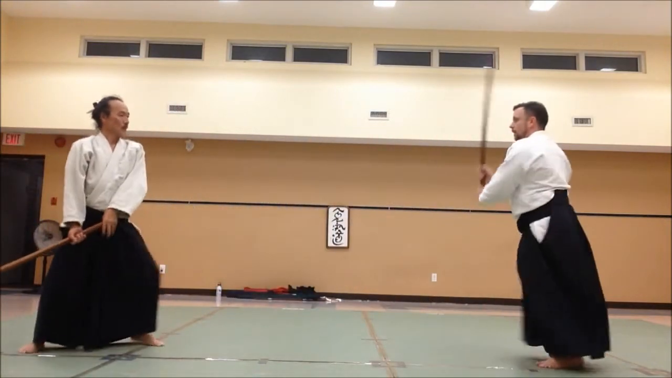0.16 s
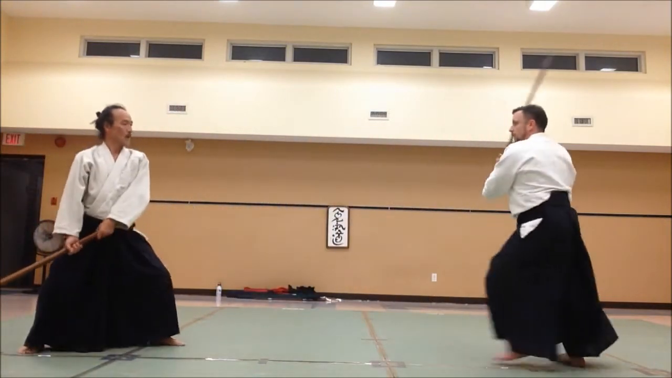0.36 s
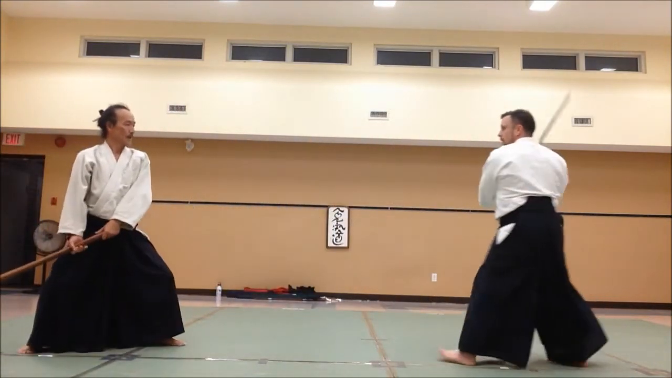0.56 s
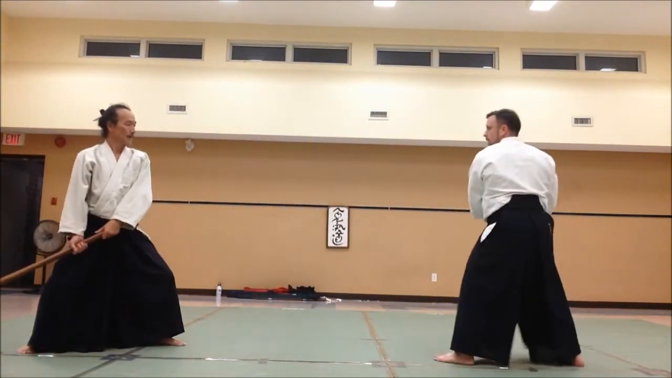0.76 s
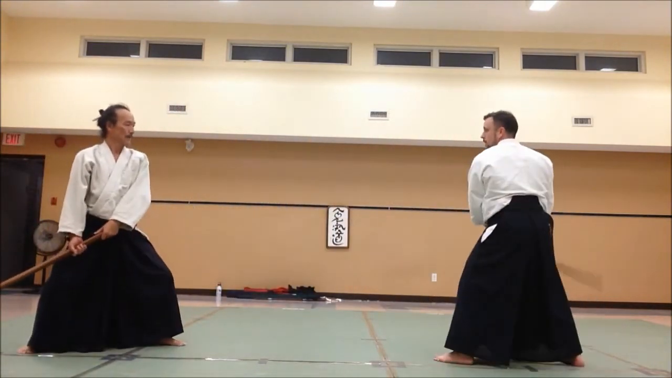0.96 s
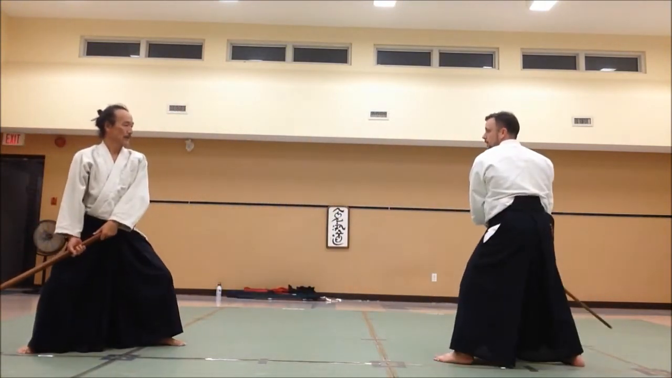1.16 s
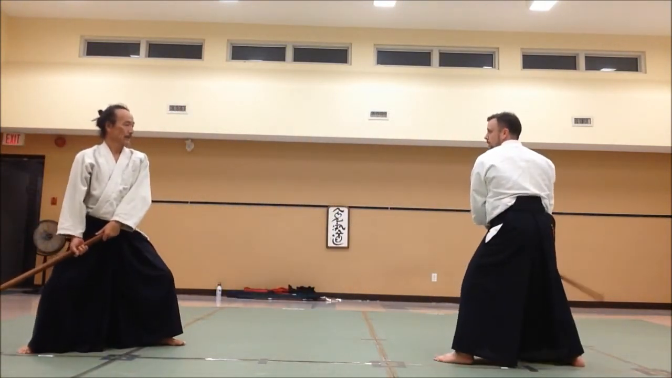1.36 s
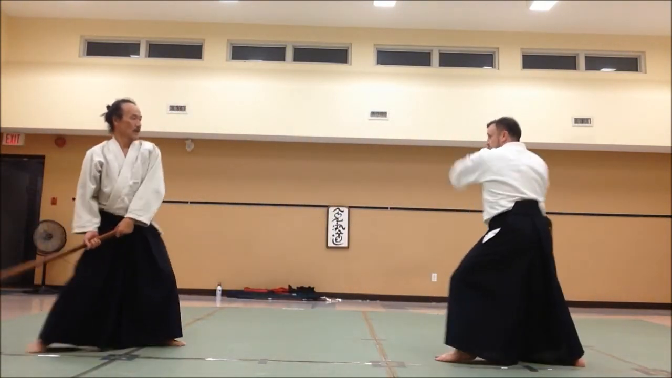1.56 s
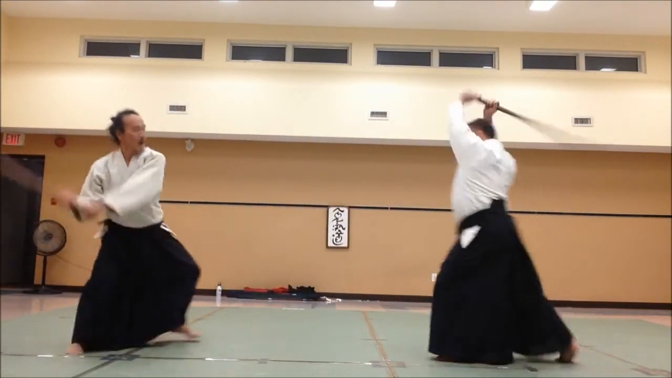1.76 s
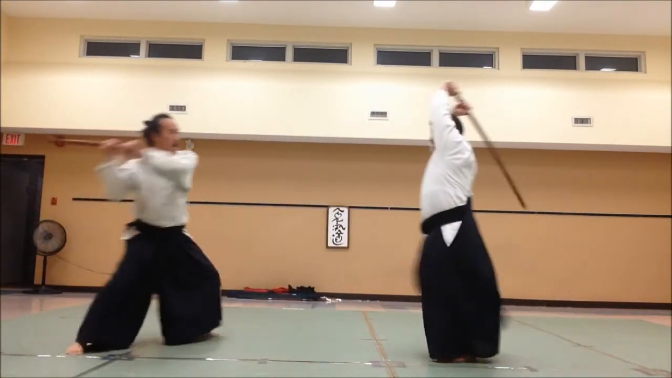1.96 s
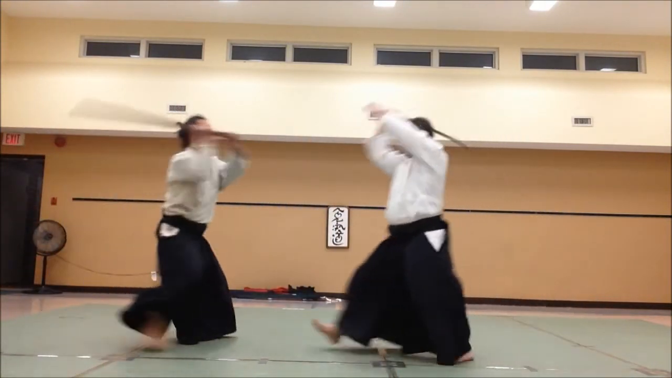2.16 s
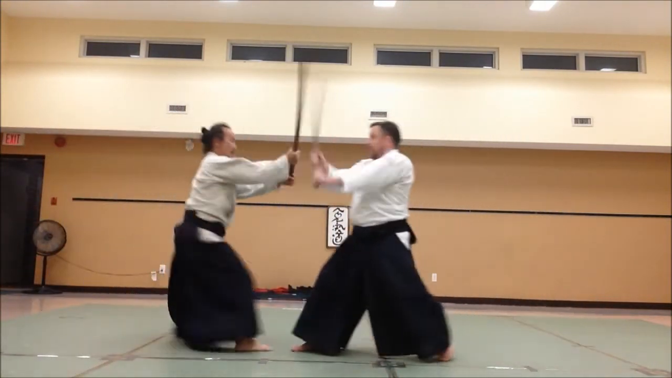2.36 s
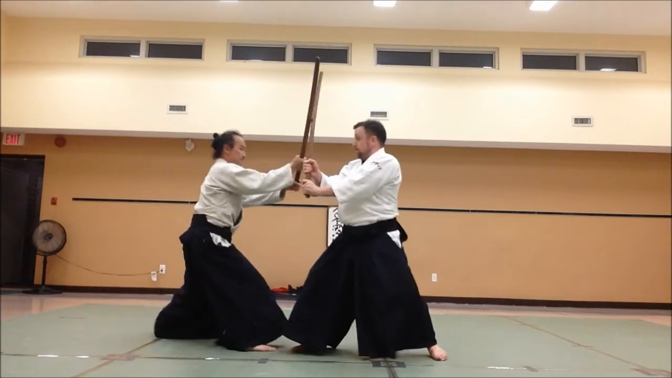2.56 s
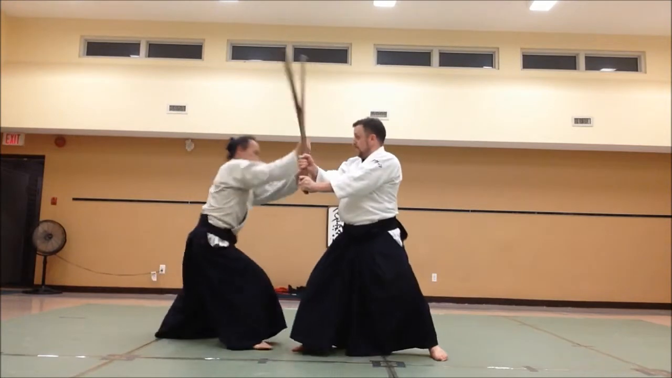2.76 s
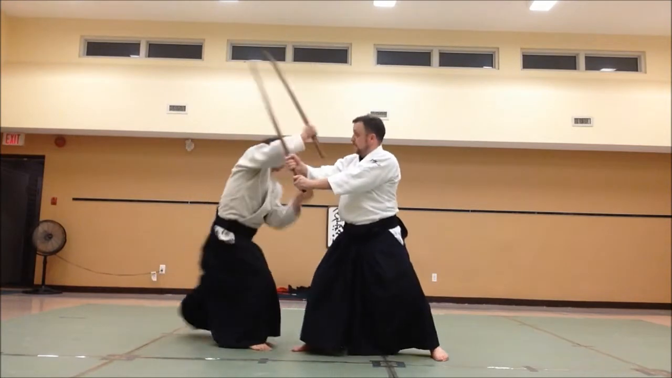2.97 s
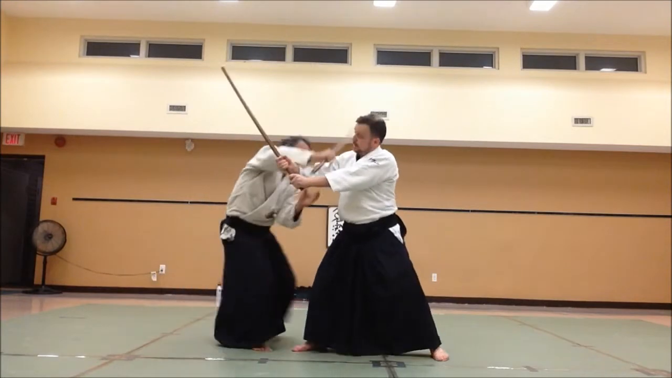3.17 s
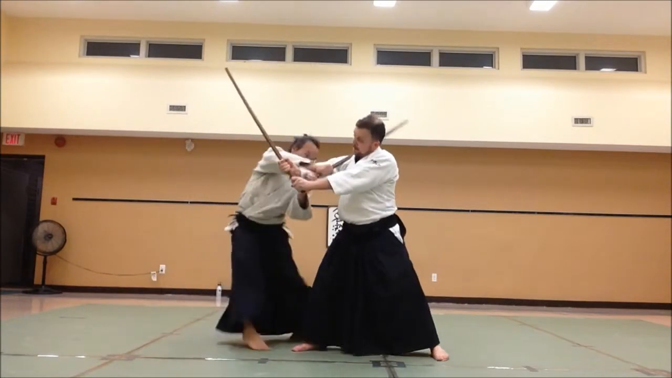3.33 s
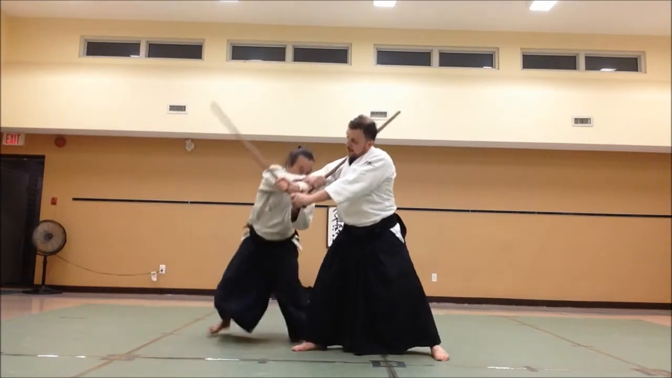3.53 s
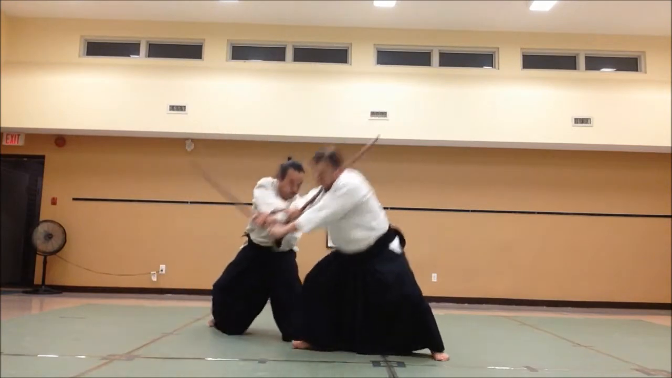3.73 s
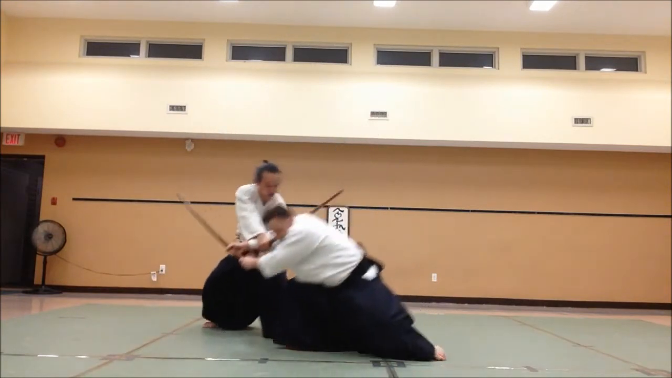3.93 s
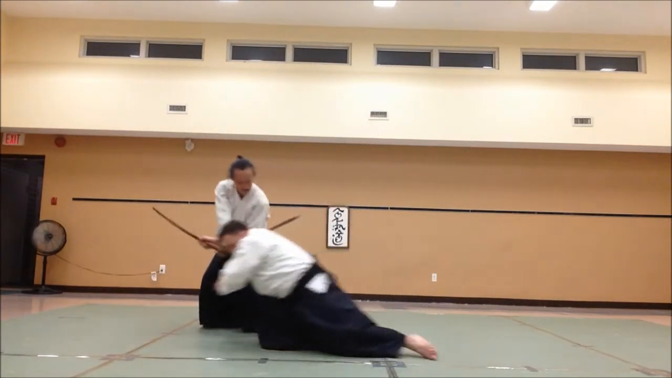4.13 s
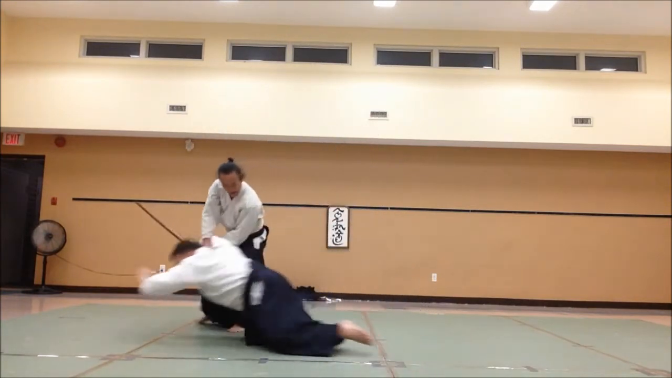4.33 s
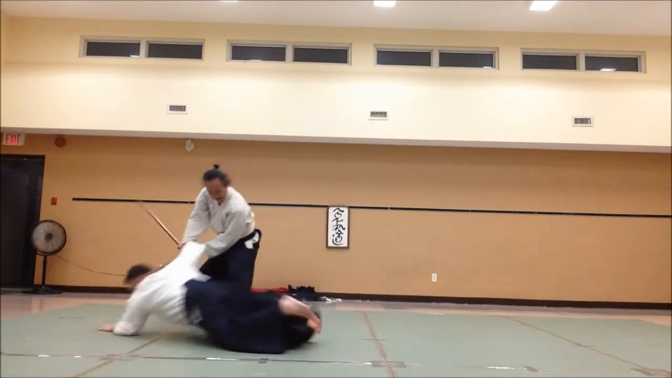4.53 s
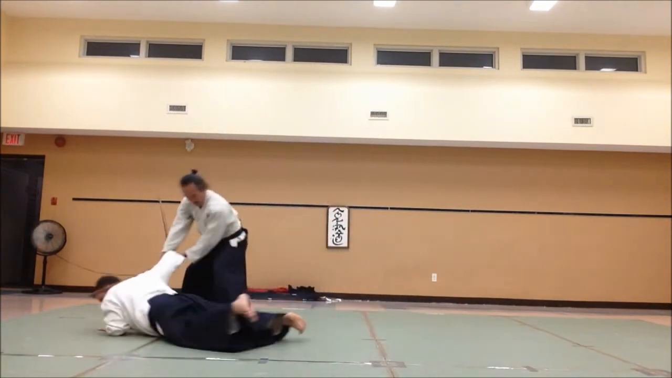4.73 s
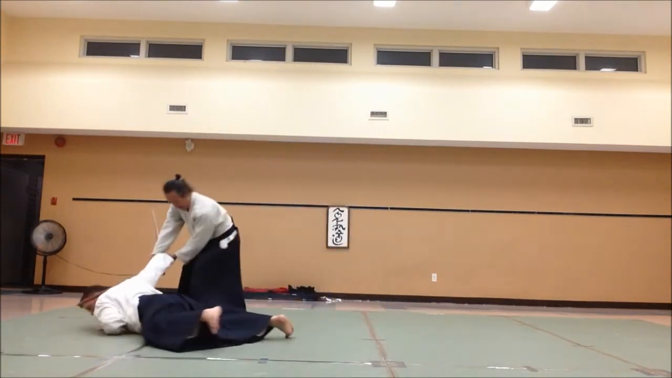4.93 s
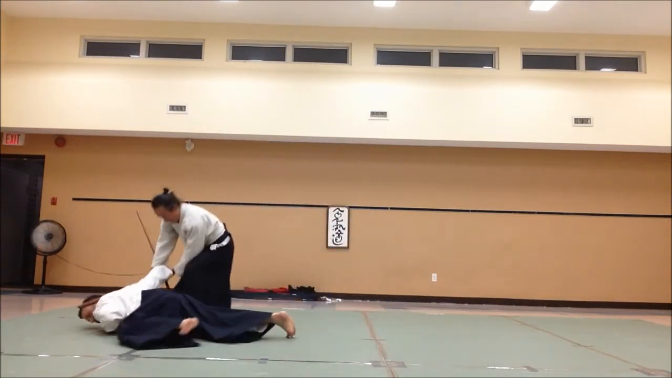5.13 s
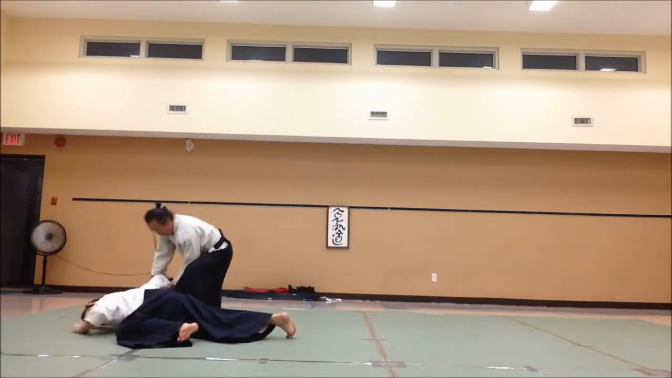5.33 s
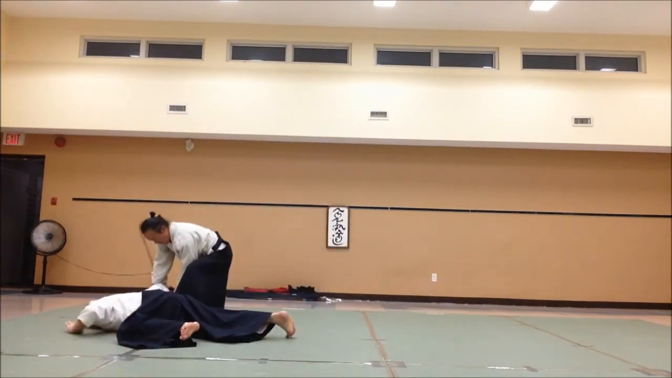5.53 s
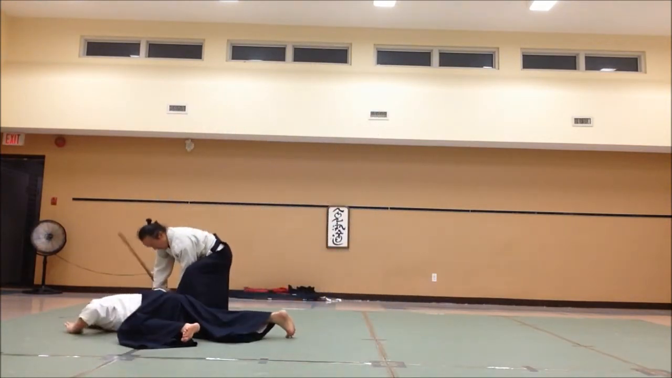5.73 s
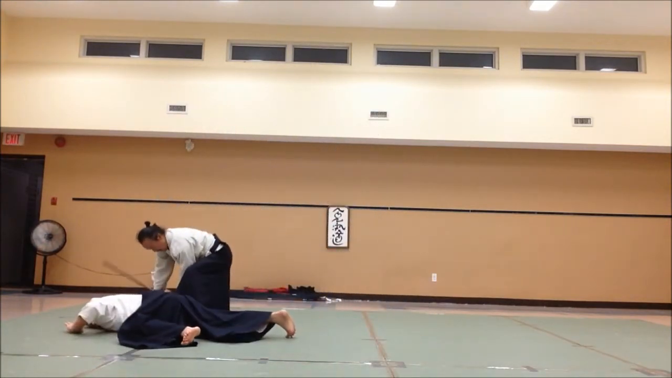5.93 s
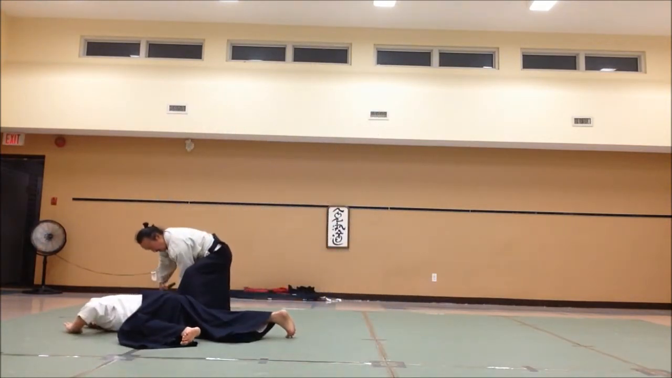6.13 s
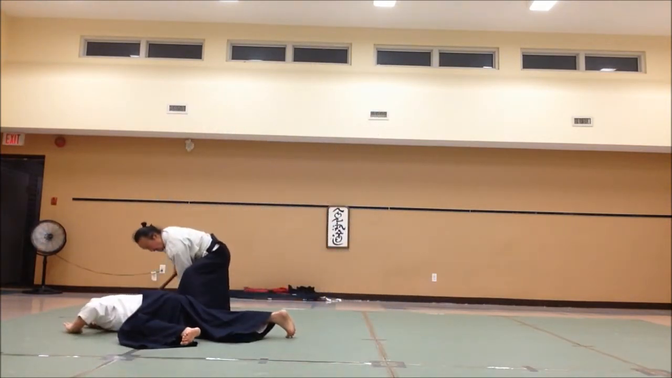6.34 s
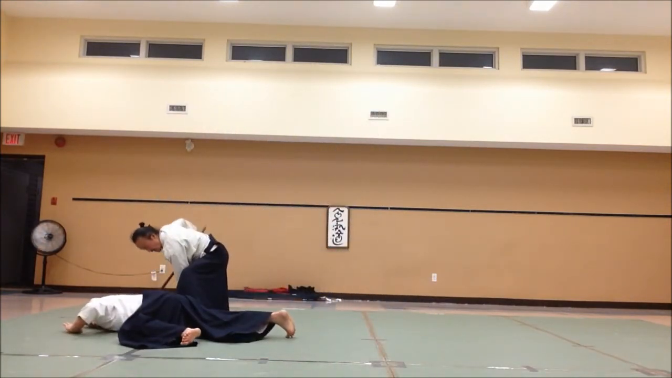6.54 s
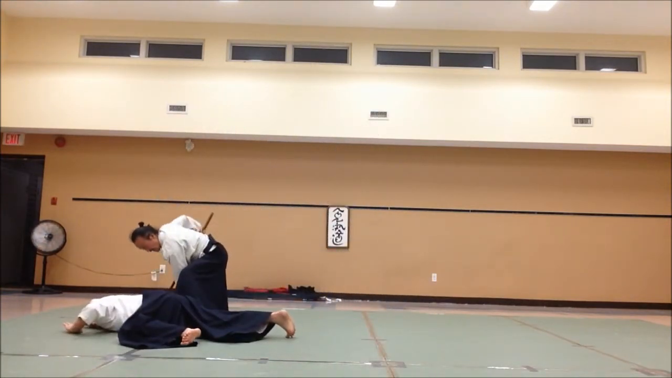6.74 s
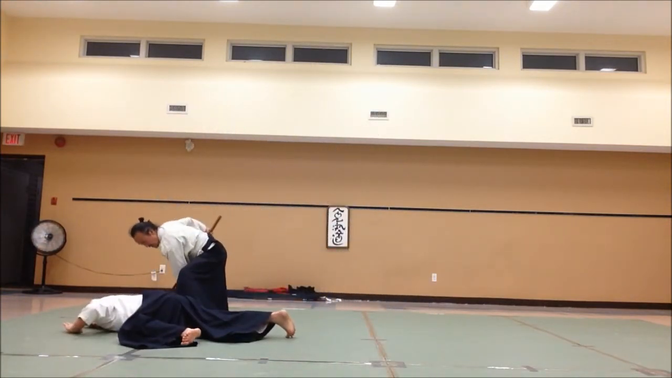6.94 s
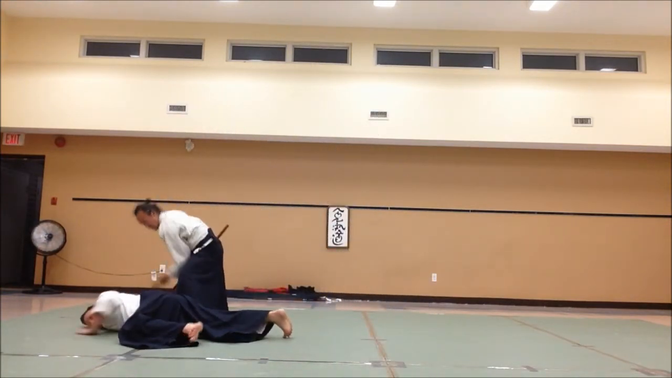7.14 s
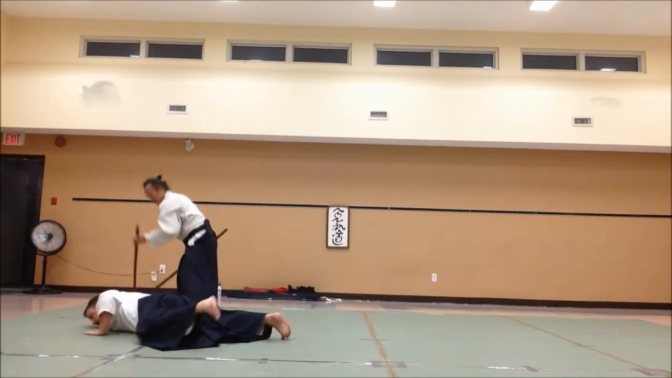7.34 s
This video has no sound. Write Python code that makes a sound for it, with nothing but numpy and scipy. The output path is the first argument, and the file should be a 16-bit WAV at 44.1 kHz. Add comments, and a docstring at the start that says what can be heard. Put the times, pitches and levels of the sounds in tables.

```python
"""A large, echoing hall, one microphone at the edge of the mat, ventilation murmuring behind.
Two people train with wooden swords: jackets rustle, bare feet pat the mats, and at 2.4 s the swords
clash once, high up between bare walls. Around 4 s cloth slides and a foot skids; then one of them is
thrown and lands on the sprung floor, limb after limb. Cloth slides again, a few soft steps follow,
and from 6.4 s a faint hum swells."""
import sys
import numpy as np
from scipy import signal
from scipy.fft import rfft, irfft, next_fast_len
from scipy.io import wavfile
from scipy.ndimage import uniform_filter1d, map_coordinates

SR = 44100
rng = np.random.default_rng(int(sys.argv[2]) if len(sys.argv) > 2 else 0)


def wav_out(sig):
    """Save sig, one row per channel (or a flat mono array), as 16-bit PCM at SR to the path in sys.argv[1]."""
    wavfile.write(sys.argv[1], SR, np.round(np.clip(np.atleast_2d(sig).T, -1, 1) * 32767).astype(np.int16))


N = 326207

# the hall's lasting echo: freq_hz, t60_s
HALL_DECAY = [(60, 0.47), (110, 1.07), (160, 1.57), (200, 1.52), (250, 0.92), (315, 1.63), (550, 0.97),
              (1150, 1.5), (2200, 1.22), (4000, 1.315), (7000, 0.86), (14000, 0.28)]
# ventilation behind the players: freq_hz, density_db
VENT_SPECTRUM = [(15, -52.5), (25, -42), (77, -1), (146, -9.5), (196, -8), (286, -10), (462, -4),
                 (621, -14), (691, -20), (856, -7.5), (1210, -12), (1720, -14.5), (2430, -17),
                 (3010, -19.5), (7500, -27.5), (9000, -35), (15000, -42.5)]
# sleeves and soles brush, one row a stroke: peak_s, level_db, rise_s, release_s
CLOTH_STROKES = [(0.2, -61, .04, .2), (0.333, -47, 0.035, 0.043), (0.4, -61, .08, 0.26),
                 (0.75, -63, .03, .2), (1.725, -51, 0.18, 0.29), (2.11, -55.5, .08, 0.15),
                 (2.95, -52.5, 0.19, 0.18), (3.11, -47.5, 0.085, 0.78), (3.28, -53, 0.24, 0.71),
                 (3.7, -57, .15, 0.21), (3.88, -48, 0.087, .3), (3.96, -46, 0.18, 0.28),
                 (4.21, -45, 0.14, 0.2), (4.375, -47.5, 0.054, 0.087), (4.98, -56.5, 0.093, 0.32),
                 (5.1, -53.5, 0.095, 0.17), (5.32, -62, 0.073, 0.25), (7.08, -62.5, 0.11, 0.55),
                 (7.35, -58.5, .4, .9)]
# heavy cloth folds and drags, loudest in the grapple: time_s, level_db
FOLD_LEVELS = [(0, -51), (.6, -56), (.9, -60.5), (1.45, -56), (2.3, -52), (3.4, -61.5), (3.78, -49.5),
               (3.95, -47), (4.5, -44), (4.9, -48), (5.8, -51.5), (6.1, -55.5), (6.3, -52), (6.95, -55.5),
               (7.08, -48), (7.4, -49.5)]
# bright swish and duller folds: freq_hz, density_db
SWISH_SPECTRUM = [(500, 2), (2000, -4.5), (4000, 4), (6000, 4.5), (7800, 2), (8800, -5), (12000, -5),
                  (15000, -10.5)]
FOLD_SPECTRUM = [(60, -21), (200, 2), (450, 2.5), (1100, 1), (1800, -2.5), (3000, -9.5), (6000, -15.5),
                 (15000, -34)]
# toes flick the mat as a foot shifts: start_s, level_db, edge_hz
TOE_FLICKS = [(0.172, -37, 5500), (0.189, -45, 14000), (0.223, -34, 2200), (0.729, -52.5, 12000),
              (0.745, -49, 9100), (1.514, -52.5, 10000), (2.28, -54, 12000), (7.207, -47, 12000)]
# bare feet, heel first and then the ball: start_s, pat_db, weight_db, tick_db, heel_to_ball_s
FOOTFALLS = [(0.338, -29.5, -46, -39, .033), (1.728, -34.5, -40.5, -37, 0.023),
             (1.872, -35.5, -58, -55, .017), (2.023, -31, -44, -38, .017), (2.326, -34, -38, -34.5, 0.019),
             (2.389, -28, -37, -29.5, 0.013), (4.286, -38, -40.5, -54, 0.016),
             (5.088, -37.5, -58, -48, .02), (5.769, -46, -58, -62, .02), (6.238, -36, -47, -47, .012),
             (6.465, -43.5, -61, -55, .02), (7.359, -37.5, -53, -53, .02)]
# a foot's low push, hollow pat and tick of skin: freq_hz, density_db
WEIGHT_SPECTRUM = [(20, -25), (75, -1.5), (130, -3.5), (250, -4.5), (700, -43), (2000, -88)]
PAT_SPECTRUM = [(100, -19), (220, 0.5), (320, 2.5), (440, 1.5), (620, 2), (900, -3), (1400, -11.5),
                (2400, -17), (4500, -25.5), (12000, -43)]
TICK_SPECTRUM = [(1000, -25), (2500, -6), (5500, -0.5), (9000, -5.5), (15000, -4.5)]
# the swords meet: start_s, level_db
SWORD_HITS = [(2.4219, -0.5)]
# bending modes of the hardwood swords: pitch_hz, level_db, t60_s
SWORD_MODES = [(302, -10, 0.089), (557, -14, 0.12), (1119, -18, 0.042), (1263, -11.5, 0.043),
               (1710, -7.5, 0.023), (1983, -0.5, 0.03), (2074, -4, 0.049), (2410, -17, .04),
               (2865, -2.5, 0.026), (3120, -18, 0.046), (3630, -4.5, 0.027), (4180, -21, 0.016),
               (5300, -14, 0.009)]
# the crack of wood on wood: freq_hz, density_db
CRACK_SPECTRUM = [(150, -35), (300, -21), (450, -4), (750, -6), (1150, 5), (2200, -1.5), (4200, -4),
                  (6000, -11.5), (8500, -22), (15000, -33)]
# above head height the bare walls throw the clash back and forth: delay_s, level_db
WALL_ECHOES = [(0.031, -5), (0.0481, -15), (0.0997, -7), (0.1493, -11.5), (0.251, -35)]
# cloth slides over the mat's fine ribs:
# peak_s, level_db, rise_s, release_s, rib_hz, overtone_step_db, speed_spread (0-1)
CLOTH_SLIDES = [(4.03, -50.5, 0.45, 0.2, 1750, 0, .045), (5.5, -51.5, 0.19, 0.44, 1600, -11, .2)]
# a bare foot skids over the mat: time_s, slip_hz, level_db
SKID_PATH = [(4.279, 390, -50), (4.319, 400, -46), (4.351, 550, -35.5), (4.381, 690, -31),
             (4.409, 780, -45), (4.452, 1000, -43.5)]
# parts of the body land: start_s, thud_db, slap_db
LANDINGS = [(4.5570, 2.5, 3), (4.5700, -2, -5.5), (4.5828, 3, -22), (4.5913, -7.5, -3), (4.6120, -4.5, -5),
            (4.6280, -0.5, -13)]
# the mat on its sprung floor: pitch_hz, level_db, t60_s
MAT_MODES = [(94.4, -21, 0.22), (141, -14, 0.096), (171.6, 0.5, 0.048), (238.5, -3, 0.082), (500, -8, 0.01)]
# cloth and skin slap the mat: freq_hz, density_db
SLAP_SPECTRUM = [(30, -42), (150, -25), (380, 3.5), (600, 5), (1150, -0.5), (2200, -9.5), (4300, -7.5),
                 (7000, -13), (10000, -21), (15000, -26)]


def amp(db):
    """Decibels to gain."""
    return 10 ** (np.asarray(db) / 20)


def unit(x):
    """Scale to rms 1."""
    return x / np.sqrt(np.mean(x ** 2) + 1e-20)


def along(points, hz):
    """Read (freq_hz, value) points on a log frequency axis."""
    freqs, values = np.transpose(points)
    return np.interp(np.log(hz + 1), np.log(freqs + 1), values)


def clock(size):
    """Seconds for each sample."""
    return np.arange(size) / SR


def swell(times_s, levels_db):
    """Smooth gain through the given levels, silent outside them."""
    return uniform_filter1d(amp(np.interp(clock(N), times_s, levels_db, left=-120, right=-120)), size=600)


def wobble(rate):
    """A smooth random curve, rate knots a second."""
    return map_coordinates(rng.standard_normal(int(N * rate / SR) + 4), [clock(N) * rate])


def coloured(x, spectrum):
    """Pass x through a causal filter of unit energy with the given spectrum."""
    size = 8192
    gain = amp(along(spectrum, np.fft.rfftfreq(size, 1 / SR)))
    cepstrum = irfft(np.log(gain))
    cepstrum[1:size // 2] *= 2  # folded onto positive time for minimum phase
    cepstrum[size // 2 + 1:] = 0
    impulse = irfft(np.exp(rfft(cepstrum)))
    return signal.fftconvolve(x, impulse / np.linalg.norm(impulse))[:len(x)]


def tapered(x, edge_hz, kind="low"):
    """A gentle low-pass or high-pass."""
    return signal.sosfilt(signal.butter(2, min(edge_hz, SR / 3), kind, fs=SR, output="sos"), x)


def add(track, start_s, sound):
    """Mix a sound into the track at start_s."""
    start = max(0, round(start_s * SR))
    track[start:start + len(sound)] += sound[:max(0, N - start)]


def burst(spectrum, t60):
    """A dying puff of noise with a smooth spectrum, starting near rms 1."""
    fade = amp(-60 * clock(SR // 2) / t60)
    bins = rfft(fade * rng.standard_normal(len(fade)))
    flat = irfft(bins / (np.abs(bins) + 1e-12), len(fade)) * fade ** (1 / 10)
    return unit(coloured(flat, spectrum)) * np.sqrt(np.mean(fade ** 2))


def ring(modes, scatter_db, detune):
    """Damped modes, struck at slightly new strengths and pitches."""
    t = clock(SR // 2)
    return sum(amp(db + scatter_db * rng.normal() - 60 * t / t60)
               * np.cos(2 * np.pi * hz * (1 + detune * rng.normal()) * t)
               for hz, db, t60 in modes)


def stroke(peak_s, level_db, rise_s, release_s, depth_db=14.5):
    """Gain of one movement: it climbs depth_db in its rise time and sinks as far in its release time."""
    t = clock(N) - peak_s
    return amp(level_db - depth_db * np.maximum(-t / rise_s, t / release_s))


def in_hall(x, near_db, far_db, near_t60, build_s, direct_db=0):
    """What reaches the microphone: direct sound, brief scatter from nearby, and the hall's long echo."""
    t = clock(3 * SR // 2)
    hz, frame_s, bins = signal.stft(rng.standard_normal(len(t)), SR, nperseg=512)
    decay = amp(-60 * frame_s / along(HALL_DECAY, hz)[:, None])
    far = signal.istft(bins * decay, SR, nperseg=512)[1][:len(t)]
    near = rng.standard_normal(len(t)) * amp(-60 * t / near_t60)
    # echoes are sparse at first and thicken as more walls answer
    density = np.clip((t / (3 * build_s)) ** 2, .003, 1)
    arrivals = (rng.random(len(t)) < density) / np.sqrt(density)
    onset = 1 - np.exp(-(t / build_s) ** 2)
    echoes = amp(near_db) * near / np.linalg.norm(near) + amp(far_db) * far / np.linalg.norm(far)
    response = arrivals * onset * echoes
    response[0] = amp(direct_db)
    return signal.fftconvolve(x, response)


def ventilation(level_db=-54.5):
    """Room tone: the steady, low murmur of moving air."""
    return amp(level_db) * unit(coloured(rng.standard_normal(N), VENT_SPECTRUM))


def cloth_rustle():
    """Fibres catch and let go in tiny clumped grains: a bright swish over duller folds."""
    fibres = lambda clump_db: rng.standard_normal(N) * amp(clump_db * wobble(500))
    motion = np.sqrt(sum(stroke(*row) ** 2 for row in CLOTH_STROKES))
    swish = unit(coloured(fibres(clump_db=1.0), SWISH_SPECTRUM)) * motion
    fold_gain = np.hypot(swell(*np.transpose(FOLD_LEVELS)), amp(-1) * motion)  # strokes stir the folds
    folds = unit(coloured(fibres(clump_db=1.4), FOLD_SPECTRUM)) * fold_gain
    flapping = amp(.7 * wobble(30))
    return flapping * (swish * amp(0.25) + folds * amp(-1.1))


def bare_feet(ball_db=-4):
    """A heel gives a push, a pat and a tick of skin; the ball follows with no tick; toes mostly tick."""
    out = np.zeros(N)
    settle = 1 - np.exp(-clock(SR // 2) / 0.0021)  # a soft sole takes a moment to meet the mat
    weight = lambda db: amp(db + 4.5) * burst(WEIGHT_SPECTRUM, t60=0.091)
    pat = lambda db: amp(db + 3.5) * burst(PAT_SPECTRUM, t60=0.039)
    tick = lambda db: amp(db + 4.5) * burst(TICK_SPECTRUM, t60=0.018)
    at_mic = lambda touch: in_hall(settle * touch, near_db=2, far_db=-6, near_t60=0.31, build_s=0.015)
    for start_s, pat_db, weight_db, tick_db, heel_to_ball_s in FOOTFALLS:
        heel = weight(weight_db) + pat(pat_db) + tick(tick_db)
        add(out, start_s, at_mic(heel))
        ball = amp(ball_db) * (weight(weight_db) + pat(pat_db))
        add(out, start_s + heel_to_ball_s, at_mic(ball))
    for start_s, level_db, edge_hz in TOE_FLICKS:
        flick = tapered(tick(level_db) + pat(level_db - 10), edge_hz)
        add(out, start_s, in_hall(flick, near_db=-2.5, far_db=-12, near_t60=0.44, build_s=0.0099))
    return out


def sword_clash():
    """Held high, the swords crack and ring in their bending modes; more hall than direct sound."""
    out = np.zeros(N)
    for start_s, level_db in SWORD_HITS:
        low_modes = ring(SWORD_MODES[:2], scatter_db=2.5, detune=.001)
        high_modes = ring(SWORD_MODES[2:], scatter_db=2.2, detune=0.0015)
        hollow = amp(level_db - 9.5) * tapered(low_modes, edge_hz=2000)
        clack = amp(level_db - 7.5) * tapered(high_modes, edge_hz=2480)
        clack += amp(level_db - 5) * burst(CRACK_SPECTRUM, t60=0.029)
        # the two lowest modes radiate sideways, so they reach the microphone off the walls, blooming late
        bloom = in_hall(hollow, near_db=10, far_db=3, near_t60=0.54, build_s=0.031, direct_db=-22)
        add(out, start_s, bloom)
        add(out, start_s, in_hall(clack, near_db=6.5, far_db=2.5, near_t60=0.22, build_s=.017))
        for delay_s, echo_db in WALL_ECHOES:
            add(out, start_s + delay_s, amp(echo_db) * tapered(hollow + clack, edge_hz=7200))
    return out


def cloth_slides():
    """Cloth crossing the ribs of the mat gives a faint, blurred zip with two overtones."""
    out = np.zeros(N)
    for peak_s, level_db, rise_s, release_s, rib_hz, overtone_step_db, speed_spread in CLOTH_SLIDES:
        phase = 2 * np.pi * np.cumsum(rib_hz * (1 + speed_spread * wobble(900))) / SR
        zip_tone = sum(amp(overtone_step_db * k) * np.sin(k * phase) for k in (1, 2, 3))
        out += unit(zip_tone * wobble(120)) * stroke(peak_s, level_db, rise_s, release_s)
    return out


def foot_skid():
    """Ball and toes stick and slip unevenly at their own rates, faster as the foot gathers speed."""
    times_s, slip_hz, levels_db = np.transpose(SKID_PATH)

    def slips(ratio):
        rate_hz = ratio * np.interp(clock(N), times_s, slip_hz) * (1 + .14 * wobble(500))
        return np.sin(2 * np.pi * np.cumsum(rate_hz) / SR)

    grip = amp(2 * wobble(250))
    squeak = slips(ratio=0.96) + amp(-5) * slips(ratio=1.5)
    rub = amp(0.5) * unit(squeak * grip) * swell(times_s, levels_db)
    return in_hall(rub, near_db=-4, far_db=-9, near_t60=.4, build_s=.015)[:N]


def body_fall():
    """Each landing part of the body drives the mat and slaps its cover; each spot has its own echoes."""
    out = np.zeros(N)
    for start_s, thud_db, slap_db in LANDINGS:
        mat = ring(MAT_MODES, scatter_db=3.5, detune=0.013)
        thud = amp(thud_db - 7) * tapered(mat, edge_hz=540)
        thud = tapered(thud, edge_hz=80, kind="high")  # a small patch of mat radiates little deep bass
        slap = amp(slap_db - 10) * burst(SLAP_SPECTRUM, t60=0.013)
        add(out, start_s, in_hall(thud, near_db=0.5, far_db=-6, near_t60=0.29, build_s=0.018))
        add(out, start_s, in_hall(slap, near_db=2.5, far_db=-7.5, near_t60=0.42, build_s=.016))
    return out


def hum(start_s=6.36, attack_s=0.044, pitch_hz=204, start_db=-58, growth_db_per_s=7.5, roughness=.6):
    """A faint, wavering hum with quick, uneven beating sets in and grows."""
    phase = 2 * np.pi * np.cumsum(pitch_hz * (1 + 0.02 * wobble(30))) / SR
    beating = wobble(70) * np.sin(phase) + wobble(98) * np.cos(phase)
    tone = unit(np.sin(phase) + roughness * beating)
    age_s = clock(N) - start_s
    growth = np.clip(age_s / attack_s, 0, 1) * amp(start_db + growth_db_per_s * age_s)
    return growth * amp(1.1 * wobble(4.8)) * tone


def scene():
    """Everything in mono, from the edge of the mat."""
    impacts = sword_clash() + body_fall() + bare_feet()
    friction = foot_skid() + cloth_rustle() + cloth_slides()
    return (impacts + friction + ventilation() + hum())[None]


def record(dry):
    """The recorder rounds off the highest peaks and keeps nothing above its band limit."""
    ceiling, top_hz = .95, 15500
    rounded = dry / (1 + np.abs(dry / ceiling) ** 4) ** (1 / 4)
    size = next_fast_len(N + SR // 2)
    in_band = np.fft.rfftfreq(size, 1 / SR) < top_hz
    return irfft(rfft(rounded, size) * in_band, size)[..., :N]


dry = scene()
out = record(dry)
wav_out(out)
```